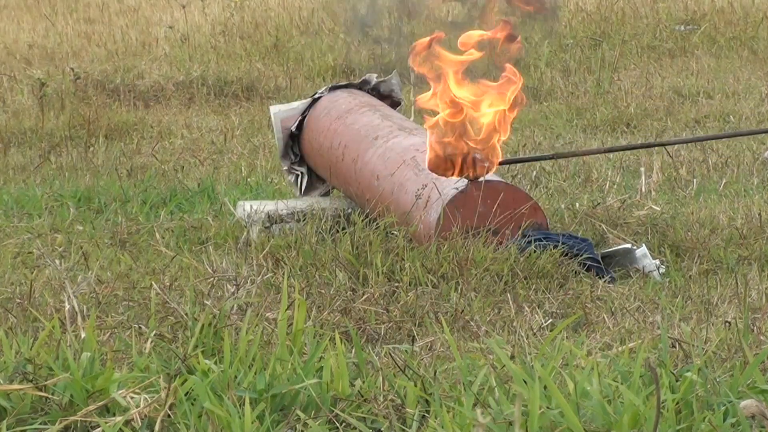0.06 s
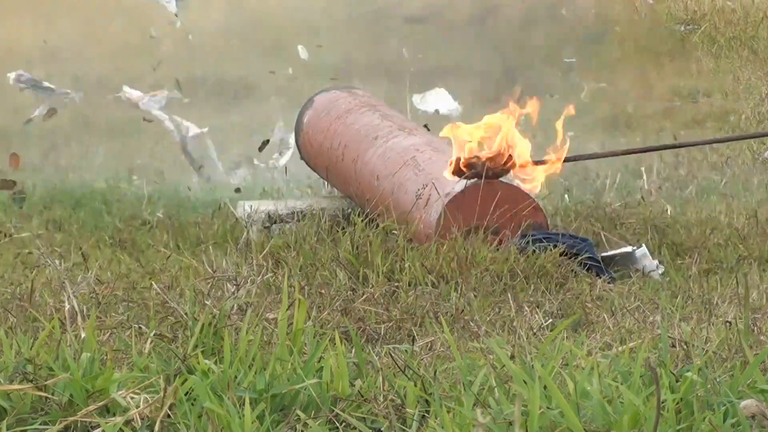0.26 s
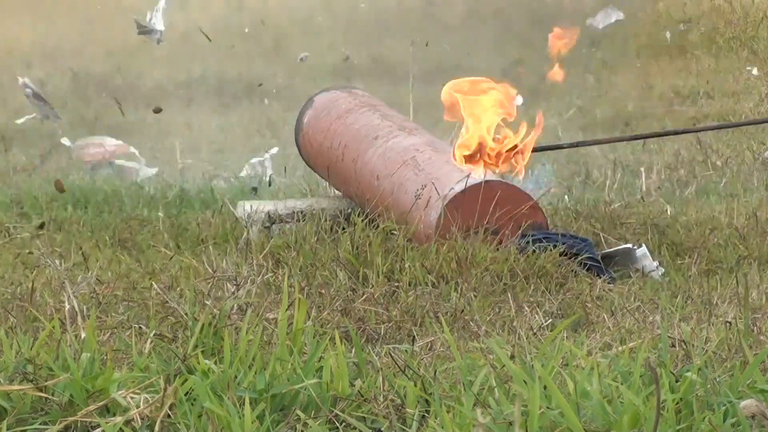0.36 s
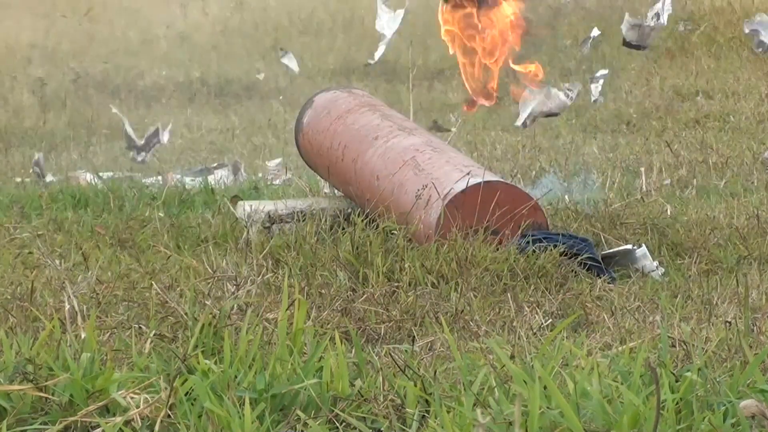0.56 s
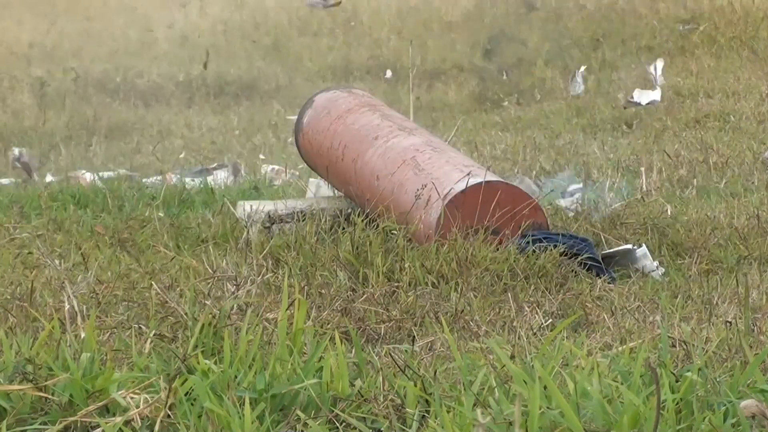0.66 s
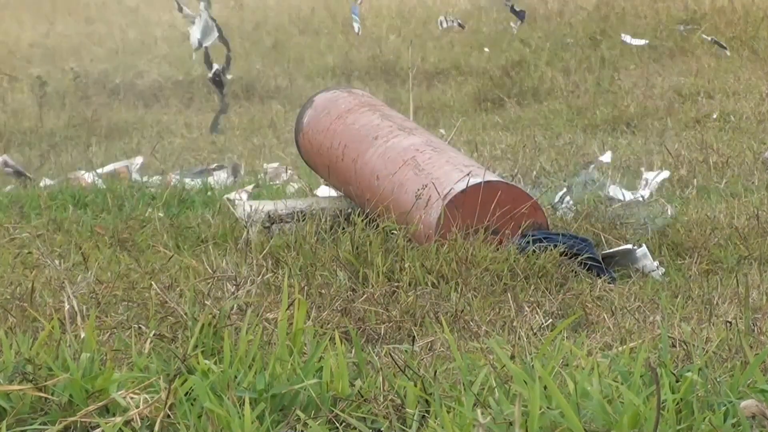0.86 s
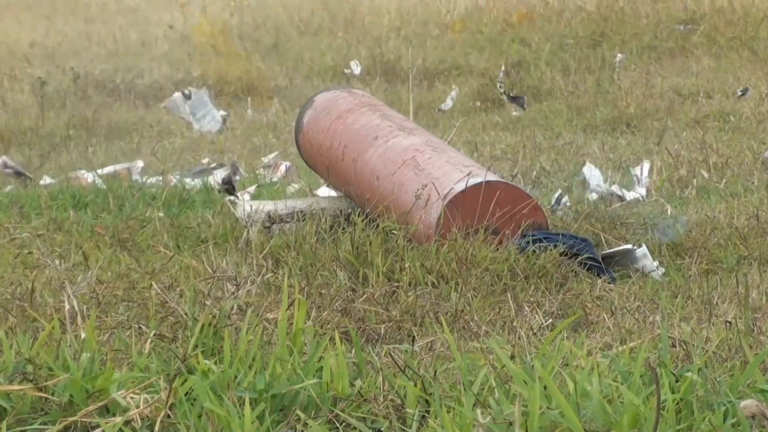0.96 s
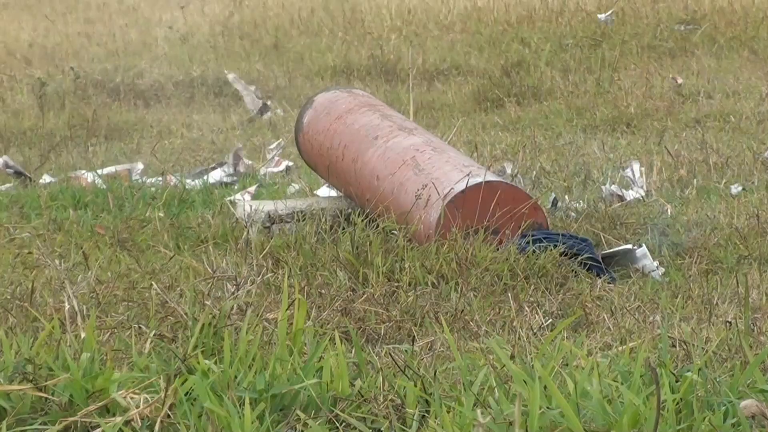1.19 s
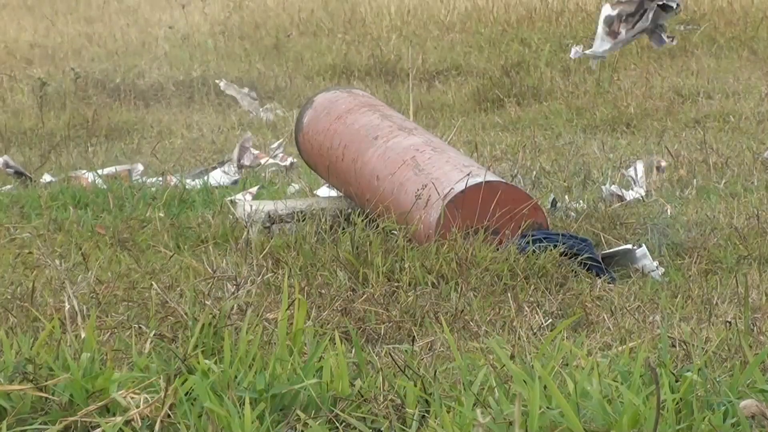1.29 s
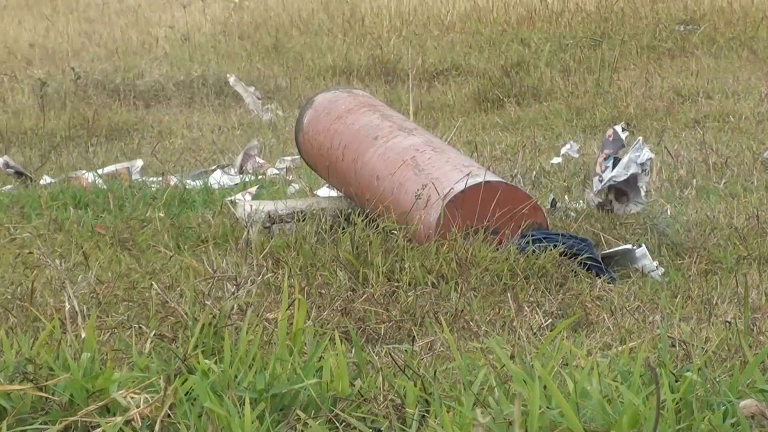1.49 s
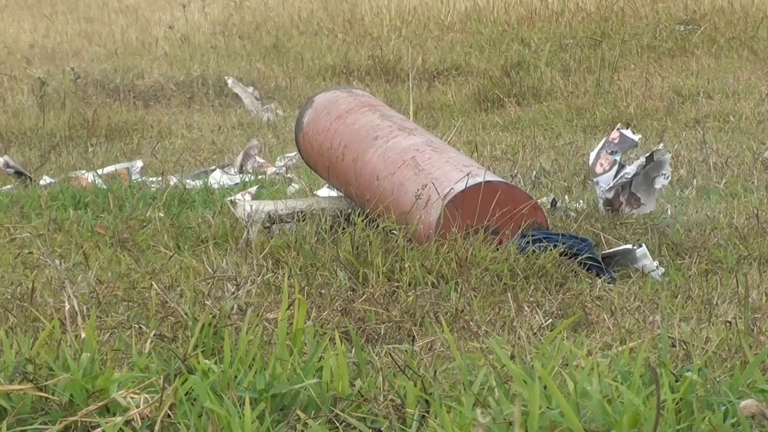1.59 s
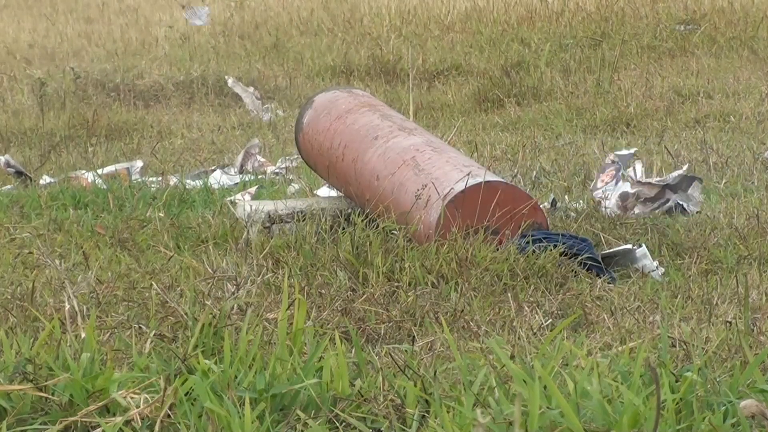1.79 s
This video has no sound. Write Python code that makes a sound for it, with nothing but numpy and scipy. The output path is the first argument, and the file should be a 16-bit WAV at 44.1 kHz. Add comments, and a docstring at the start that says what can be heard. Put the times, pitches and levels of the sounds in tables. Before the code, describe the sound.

A homemade pipe cannon fires in an open field: a brief hiss, then a loud crack and a roaring, deep boom that rolls away. A nearby torch flame puffs softly while paper shreds rustle faintly and one piece knocks.

```python
"""An open field, a carbide pipe cannon plugged with newspaper, a torch at its touch hole.
Gas spits, the charge cracks and sets the pipe ringing, and the jet's roar and the fireball's
deep rumble roll away, a little left of the microphone. Paper shreds flutter down, one piece
knocks on something hard, and the torch flame keeps puffing in the centre. The recorder's
gain drops at the shot and only creeps back."""
import sys
import numpy as np
from scipy import signal
from scipy.io import wavfile

SR = 44100
rng = np.random.default_rng(int(sys.argv[2]) if len(sys.argv) > 2 else 0)


def transcribe(signal):
    """Save signal, clipped to [-1, 1], as a 16-bit WAV file at the path in sys.argv[1]."""
    frames = np.atleast_2d(signal).T
    limited = np.clip(frames, -1, 1)
    pcm = np.round(limited * 32767).astype(np.int16)
    wavfile.write(sys.argv[1], SR, pcm)


N = 81585
T = np.arange(N) / SR
BLAST_START_S = 0.1972
# correlation between the left and right channels
ROAR_ALIKE, BOOM_ALIKE, NEAR_ALIKE, DEBRIS_ALIKE, FIELD_ALIKE = 0.85, 0.78, 1, 0.85, 0.86

# pressure fronts of the charge: (time [s], thump level [dB], crack level [dB])
PRESSURE_FRONTS = [(.2078, -3, -13), (.2154, -5, -4), (0.2199, 2.5, 6)]
# modes of the pipe: (frequency [Hz], level against the thump [dB], t60 [s])
PIPE_MODES = [(186.3, -20, 0.65), (336, -17.5, 0.43), (378.4, -14, .35), (523, -19, .3), (567, -24, 0.42)]
# roar of the escaping gas: (time [s], level [dB], leftward lean [dB], tilt [dB/octave])
ROAR_CURVE = [(.215, -95, 0, 0), (.223, -23, 15, -4), (.236, -7, 1.5, -2.5), (.26, -8.5, 3, 0.3),
              (.30, -16, 5.5, -0.5), (.322, -18.5, 5.5, 2.5), (.35, -9.5, 6, 0), (.37, -18.5, 6.5, -1.5),
              (.388, -11, 7, -1.5), (.408, -24.5, 8, -2.5), (.43, -19, 8, -2.2), (.475, -21, 6, -1.9),
              (.53, -27.5, 4, 0), (.61, -35.5, 3.5, 2.5), (.72, -35.5, 2.5, 1.5), (.88, -40, 2.5, 0),
              (1.1, -47, 4.5, -1.4), (1.3, -53.5, 6, -1), (1.85, -53, 6, -2.5)]
# its spectrum before tilt and dulling: (frequency [Hz], relative density [dB])
ROAR_SPECTRUM = [(300, -2), (600, 4.5), (1200, -0.5), (2000, 1.5), (4000, -0.5), (7000, -1.5), (9000, -7),
                 (12000, -24.5), (15500, -37)]
# it leans most in the middle range: (frequency [Hz], factor on the lean [ratio])
ROAR_LEAN_FACTOR = [(300, 0.55), (900, 1.68), (2500, 0.84), (6000, 0.82), (11000, 0.2)]
# the fireball's rumble: (frequency [Hz], relative density [dB])
BOOM_SPECTRUM = [(25, -46), (50, -15), (90, -2), (140, -1.5), (190, 0.5), (270, -6), (360, -9.5),
                 (520, -19.5), (800, -32.5), (1300, -75)]
# how long it rolls on: (frequency [Hz], t60 [s])
BOOM_DECAY = [(50, 1.2), (120, 1.95), (190, 1.32), (270, 0.73), (380, 0.4), (800, 0.63)]
# gas spitting from the touch hole: (time [s], level [dB])
SPIT_CURVE = [(.164, -76), (.168, -44), (.176, -50), (.186, -43), (.192, -26), (.202, -9.5), (.212, -10.5),
              (.219, -20), (.225, -26.5), (.238, -17), (.26, -20), (.31, -30), (.42, -80)]
# its hiss: (frequency [Hz], relative density [dB])
SPIT_SPECTRUM = [(1000, -25), (2600, -15), (4700, -4), (7200, 4.5), (10000, -5.5), (15500, -13.5)]
# single puffs of the torch flame: (time [s], peak level [dB], pitch [Hz])
FLAME_PUFFS = [(0.2232, -6.5, 131), (.2945, -9.5, 111), (0.3145, 1, 183), (.374, -1, 292), (.412, 2, 178),
               (0.435, -4, 89.2), (0.515, -9, 100), (.5345, -5.5, 170), (0.5811, -3.5, 152),
               (0.592, -4, 169), (0.6679, -2, 165), (0.7211, -4.5, 150), (.831, -13, 119),
               (0.9572, -13.5, 145), (1.026, -15, 125), (1.136, -20.5, 133), (1.186, -22, 110),
               (1.235, -15.5, 148), (1.298, -21, 115), (1.403, -21, 112), (1.5864, -7, 102),
               (1.725, -26, 93), (1.843, -21.5, 91.5)]
# its steady flutter: (frequency [Hz], relative density [dB])
FLAME_SPECTRUM = [(25, -36), (50, -10), (80, 7.5), (125, 5), (190, -9.5), (250, -9), (400, -47.5)]
# falling shreds: (time [s], length [s], level [dB], band centre [Hz], left minus right [dB])
PAPER_RUSTLES = [(0.519, 0.029, -28.5, 5400, -12), (.641, 0.0099, -33, 1570, -14.5),
                 (0.761, 0.027, -24, 3520, -5.5), (0.766, 0.022, -33, 724, -2.5),
                 (0.781, 0.011, -28, 2560, -2), (1.203, 0.023, -45.5, 1720, 4),
                 (1.331, 0.024, -45.5, 3740, -2), (1.447, 0.063, -52.5, 3440, 0),
                 (1.534, 0.028, -43.5, 3300, 2), (1.572, 0.0048, -42, 915, -7),
                 (1.587, 0.031, -43, 3030, 1.5), (1.646, 0.071, -48, 1920, 1),
                 (1.823, 0.015, -49.5, 1650, -5)]
# modes of the knock: (frequency [Hz], level [dB], t60 [s])
KNOCK_MODES = [(288, -20.5, 0.03), (440, -9.5, 0.015), (707, -11.5, 0.013), (890, -14, 0.009),
               (1390, -19.5, 0.013), (1810, -21.5, 0.019), (2290, -22.5, 0.019), (3160, -27, 0.011),
               (4400, -32, 0.011)]
# ambience of the field: (frequency [Hz], relative density [dB])
FIELD_SPECTRUM = [(25, -12), (70, -12), (140, -4.5), (220, -5), (300, -0.5), (420, -13), (900, -20.5),
                  (2000, -24), (4000, -24.5), (8000, -28.5), (15500, -35.5)]


def from_db(db):
    """Decibels to gain."""
    return 10 ** (np.asarray(db) / 20)


def in_time(rows):
    """Each column of a curve at every sample."""
    times, *columns = np.transpose(rows)
    return [np.interp(T, times, column) for column in columns]


def at_hz(points, hz):
    """Read a table on a log-frequency axis."""
    frequencies, values = np.transpose(points)
    return np.interp(np.log(hz), np.log(frequencies), values)


def pan(db):
    """Left and right gains for a level difference; positive is left."""
    return from_db(np.array([[.5], [-.5]]) * db)


def stereo_noise(alike):
    """White noise with correlation `alike` between the channels."""
    mid, side = rng.standard_normal((2, N))
    return np.sqrt((1 + alike) / 2) * mid + np.sqrt((1 - alike) / 2) * np.array([side, -side])


def butter(order, hz, kind="low"):
    """Butterworth filter sections."""
    return signal.butter(order, hz, kind, fs=SR, output="sos")


def band(noise, low_hz, high_hz, order=2):
    """Band-pass of stereo noise, run in and scaled to rms 1."""
    padded = np.hstack([noise[:, -N // 4:], noise])
    passed = signal.sosfilt(butter(order, [low_hz, high_hz], "band"), padded)[:, -N:]
    return passed / passed.std()


def coloured(spectrum, alike, shape=lambda hz: 1):
    """Stereo noise in narrow bands, of rms 1 before each takes its envelope shape(hz)."""
    edges = np.geomspace(22, 17000, 25)
    white = [stereo_noise(alike), stereo_noise(alike)]
    out, power = 0, 0
    for k, (low, high) in enumerate(zip(edges, edges[1:])):
        hz = np.sqrt(low * high)
        gain = from_db(at_hz(spectrum, hz)) * np.sqrt(high - low)
        out += gain * shape(hz) * band(white[k % 2], low, high, order=3)
        power += gain ** 2
    return out / np.sqrt(power)


def grain(depth_db, rate_hz):
    """A fast random gain of rms 1: turbulence or crinkling."""
    gain = from_db(depth_db * np.interp(T * rate_hz, np.arange(N), rng.standard_normal(N)))
    return gain / np.sqrt(np.mean(gain ** 2))


def dying(start, t60):
    """An envelope that jumps to 1 and falls 60 dB in t60 seconds."""
    return (T >= start) * from_db(-60 * np.maximum(T - start, 0) / t60)


def ring(start, hz, t60):
    """One struck mode."""
    return dying(start, t60) * np.sin(2 * np.pi * hz * (T - start))


def shot():
    """Dead ahead, each pressure front is a crack and a thump, and sets the pipe ringing."""
    crack_decay_s = 0.0006
    noise = band(stereo_noise(NEAR_ALIKE), 420, 5300, order=1)
    out = 0
    for start, thump_db, crack_db in PRESSURE_FRONTS:
        thump = ring(start, hz=200, t60=0.031)
        pipe = sum(from_db(db) * ring(start, hz, t60) for hz, db, t60 in PIPE_MODES)
        crack = noise * (T >= start) * np.exp(-np.abs(T - start) / crack_decay_s)
        out += from_db(thump_db) * (thump + pipe) + from_db(crack_db) * crack
    return out


def roar():
    """The turbulent jet and its echo from across the field, the top duller as it ages."""
    tilt_pivot_hz, dulling_above_hz, dulling_db_per_octave_s = 2310, 4960, 10
    level_db, lean_db, tilt = in_time(ROAR_CURVE)
    age = np.maximum(T - BLAST_START_S, 0)

    def shape(hz):
        tilt_db = tilt * np.log2(max(hz, 500) / tilt_pivot_hz)
        dulling_db = dulling_db_per_octave_s * age * max(np.log2(hz / dulling_above_hz), 0)
        return from_db(tilt_db - dulling_db) * pan(lean_db * at_hz(ROAR_LEAN_FACTOR, hz))
    turbulence = grain(depth_db=2.5, rate_hz=700)
    return from_db(level_db) * turbulence * coloured(ROAR_SPECTRUM, ROAR_ALIKE, shape)


def boom():
    """The fireball's lumpy rumble; its lows swell slowest, outlast the mids and stay centred."""
    attack_s, swell_cycles, hold_s = 0.004, 8.7, 0.21
    centred_below_hz, lean_db_per_octave = 114, 3
    age = T - BLAST_START_S
    release = np.maximum(age - hold_s, 0)

    def shape(hz):
        swell = np.clip(age / (attack_s + swell_cycles / hz), 0, 1)
        fading = from_db(-60 * release / at_hz(BOOM_DECAY, hz))
        lean_db = lean_db_per_octave * max(np.log2(hz / centred_below_hz), 0)
        return swell * fading * pan(lean_db)
    lumps = grain(depth_db=2, rate_hz=60)
    rumble = from_db(-5.5) * lumps * coloured(BOOM_SPECTRUM, BOOM_ALIKE, shape)
    mid = rumble.mean(axis=0)
    return mid + signal.sosfiltfilt(butter(2, centred_below_hz, "high"), rumble - mid)


def touch_hole():
    """Burning gas spits from the small hole near the microphone, starting just before the shot."""
    level_db, = in_time(SPIT_CURVE)
    sputter = grain(depth_db=3, rate_hz=1100)
    return from_db(level_db) * sputter * coloured(SPIT_SPECTRUM, NEAR_ALIKE)


def torch_flame():
    """The flame close by: a low flutter with single soft puffs of a cycle or two."""
    start_s, rise_s, puff_sigma_cycles = 0.14, 0.2, 0.58
    rise = np.clip((T - start_s) / rise_s, 0, 1)
    flutter = from_db(-32) * rise * coloured(FLAME_SPECTRUM, NEAR_ALIKE)
    puffs = 0
    for peak_s, db, hz in FLAME_PUFFS:
        cycles = hz * (T - peak_s)
        envelope = np.exp(-.5 * (cycles / puff_sigma_cycles) ** 2)
        puffs += from_db(db) * envelope * np.cos(2 * np.pi * cycles)
    return flutter + puffs


def paper():
    """Shreds fall on both sides of the microphone, each with a short crinkling swish."""
    edge_ratio, top_hz = 1.82, 8500
    crinkle = stereo_noise(DEBRIS_ALIKE) * grain(depth_db=2.5, rate_hz=780)
    out = 0
    for peak_s, length, db, hz, side_db in PAPER_RUSTLES:
        envelope = np.exp(-2 * ((T - peak_s) / length) ** 2)
        swish = band(crinkle, hz / edge_ratio, hz * edge_ratio)
        out += from_db(db) * pan(side_db) * envelope * swish
    return signal.sosfilt(butter(4, top_hz), out)


def knock():
    """A piece of the plug hits something hard on the left: a dry knock, scatter and a faint echo."""
    start_s, scatter_hz, top_hz = 0.9219, 1150, 5500
    modes = sum(from_db(db) * ring(start_s, hz, t60) for hz, db, t60 in KNOCK_MODES)
    noise = band(stereo_noise(DEBRIS_ALIKE), scatter_hz / 2.8, scatter_hz * 1.7)
    scatter = from_db(-28.5) * dying(start_s, t60=0.055) * noise
    echo = from_db(-42.5) * dying(start_s, t60=0.42) * noise
    return pan(db=5) * signal.sosfilt(butter(3, top_hz), modes + scatter + echo)


def field():
    """The steady low hush of the open field around the microphone."""
    return from_db(-46.5) * coloured(FIELD_SPECTRUM, FIELD_ALIKE)


def gain_control(x):
    """The recorder's gain drops as soon as the level passes a threshold, then creeps back."""
    threshold_db, most_db, sense_s, recover_db_per_s = -26.5, 6.5, 0.0082, 0.6
    pole = np.exp(-1 / (sense_s * SR))
    power = signal.lfilter([1 - pole], [1, -pole], np.mean(x ** 2, axis=0))
    duck_db = np.clip(10 * np.log10(power + 1e-12) - threshold_db, 0, most_db)
    recovery_db = recover_db_per_s * T
    held_db = np.maximum.accumulate(duck_db + recovery_db) - recovery_db
    return x * from_db(-held_db)


def scene():
    """The shot and its aftermath as they reach the microphone."""
    return touch_hole() + shot() + roar() + boom() + torch_flame() + paper() + knock() + field()


def record(dry):
    """Behind the microphone: low cut, gain control, rounded peaks and a steep top cut."""
    low_cut_hz, ceiling, top_cut_hz = 35.5, 1.05, 15600
    ducked = gain_control(signal.sosfilt(butter(2, low_cut_hz, "high"), dry))
    rounded = ceiling * np.tanh(ducked / ceiling)
    return signal.sosfilt(signal.ellip(12, .1, 80, top_cut_hz, fs=SR, output="sos"), rounded)


dry = scene()
out = record(dry)
transcribe(out)
```